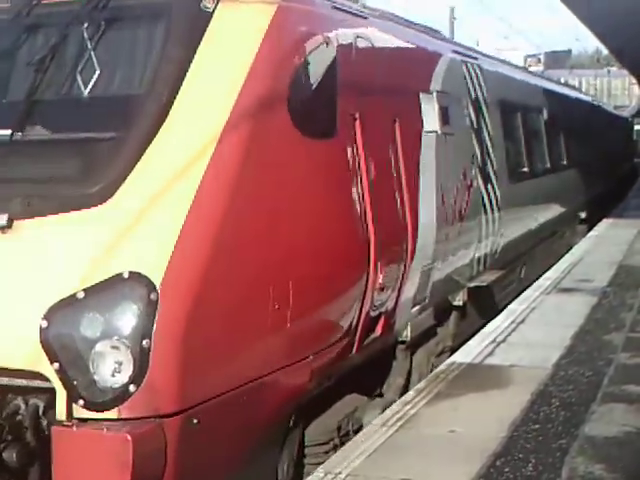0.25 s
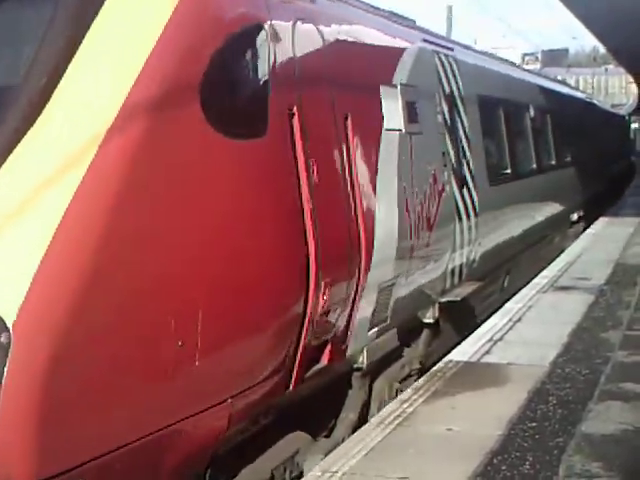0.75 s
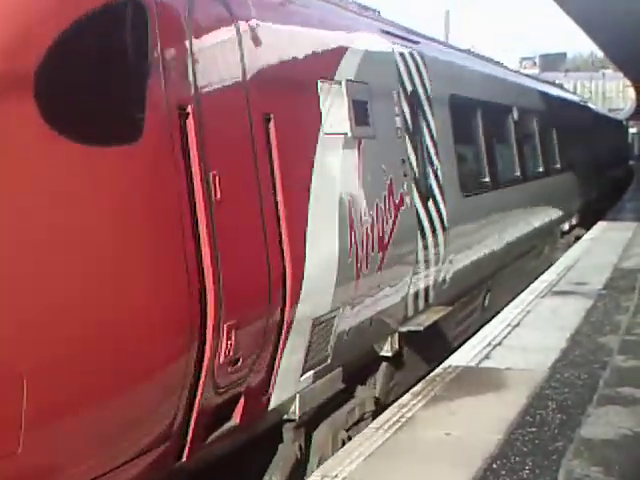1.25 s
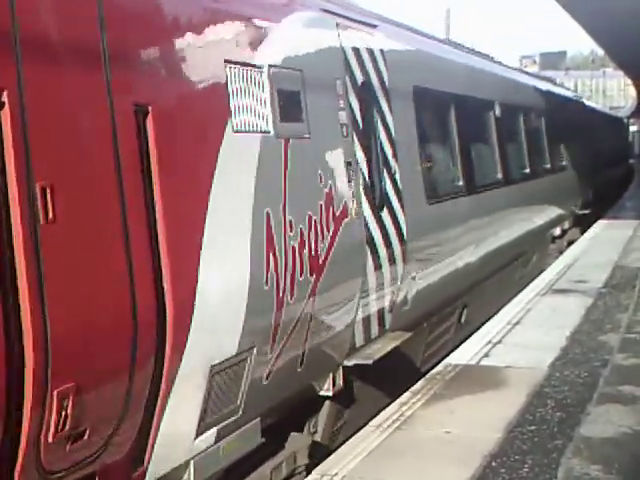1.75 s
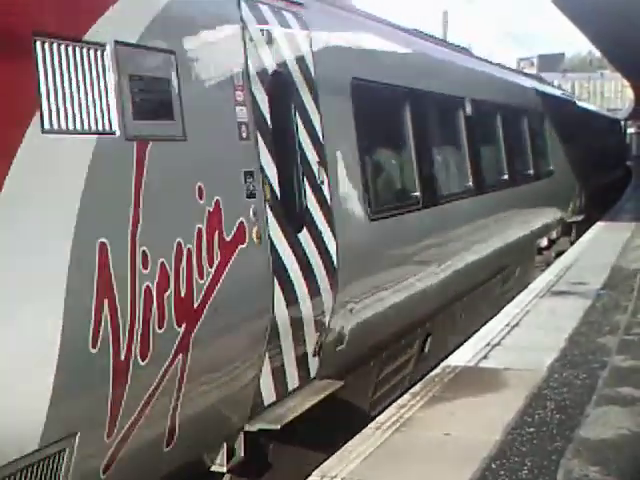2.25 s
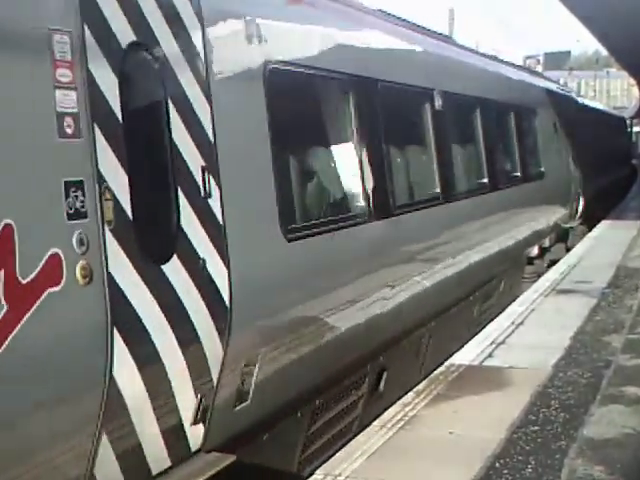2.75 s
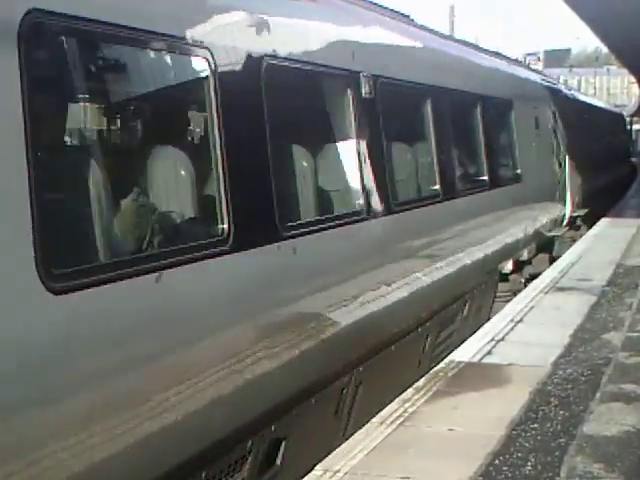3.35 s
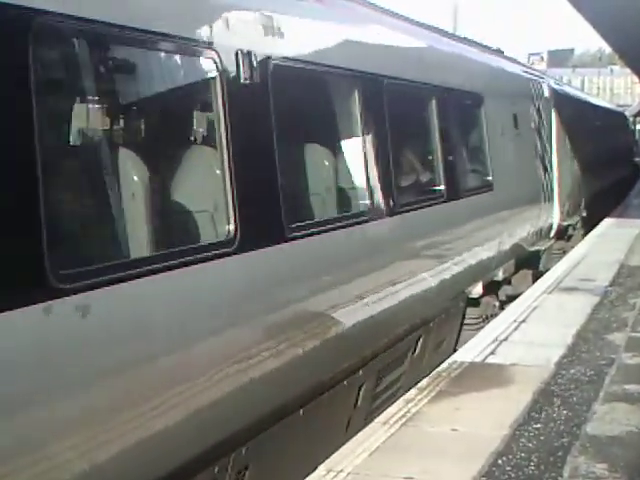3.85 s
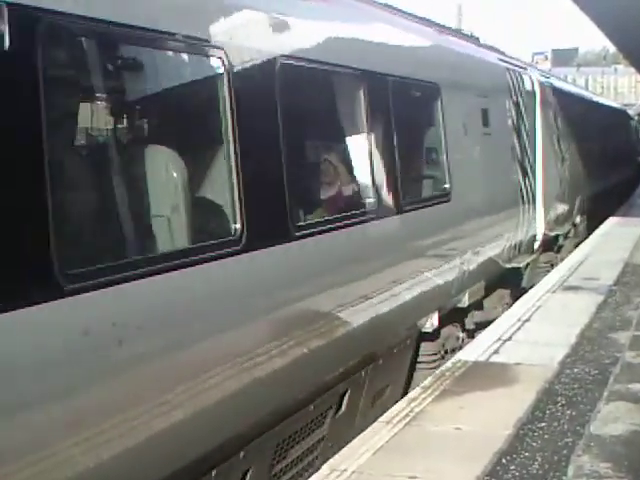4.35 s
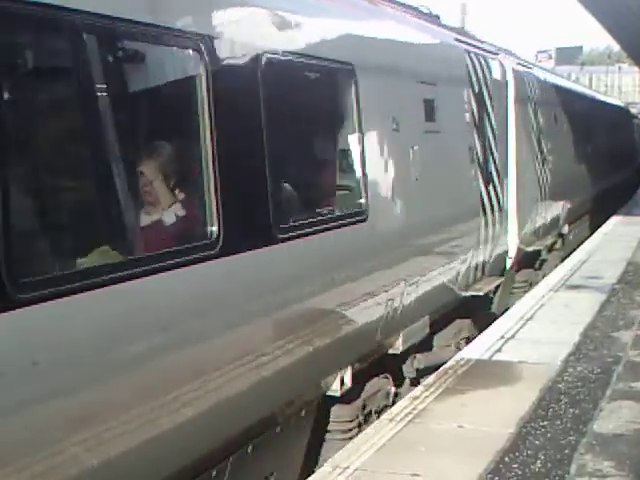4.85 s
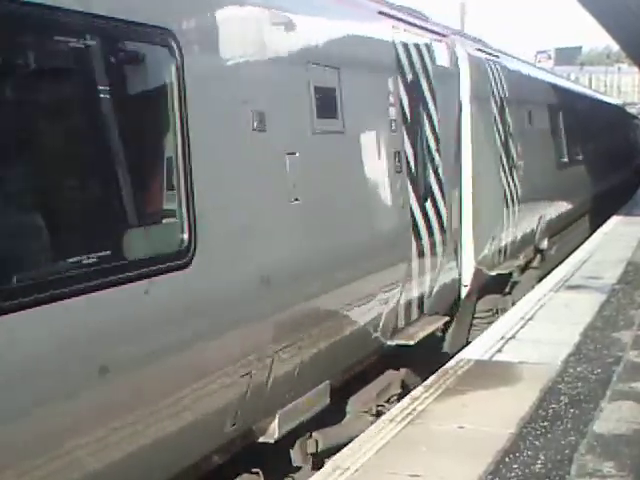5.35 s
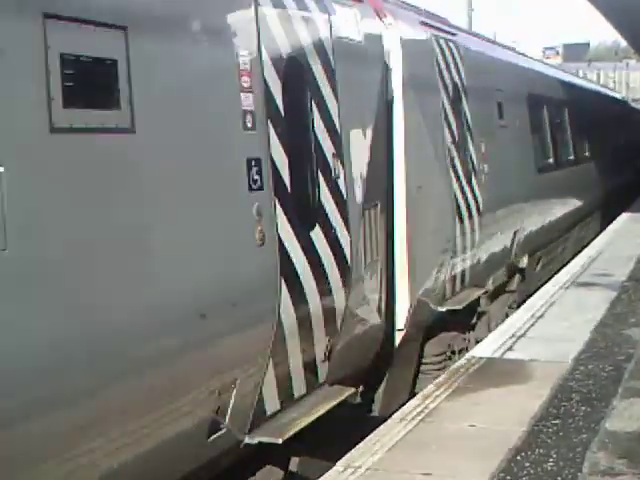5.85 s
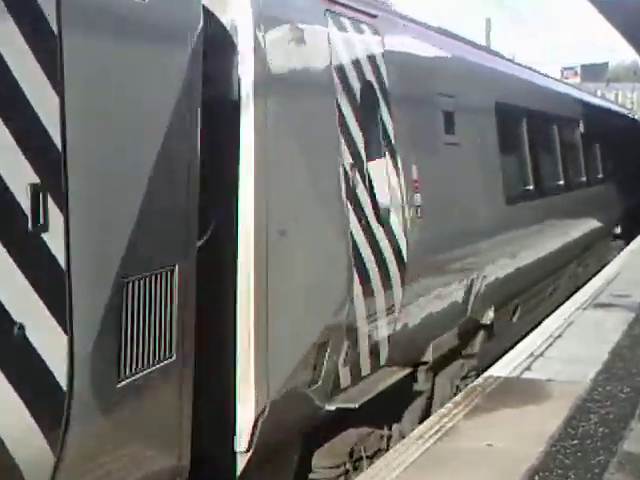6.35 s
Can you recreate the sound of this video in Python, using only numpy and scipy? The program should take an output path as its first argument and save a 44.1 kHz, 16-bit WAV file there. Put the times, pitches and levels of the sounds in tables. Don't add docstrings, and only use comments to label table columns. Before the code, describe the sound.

Low pulsing diesel drone gathers speed as a passenger train rolls past; rumble, wheel thuds, passing hums and a fuzzy turbo whine, dully captured.

```python
import sys
import numpy as np
from scipy import signal
from scipy.io import wavfile
from scipy.ndimage import uniform_filter1d

SR = 44100
rng = np.random.default_rng(int(sys.argv[2]) if len(sys.argv) > 2 else 0)


def store_wav(level_fs):
    pcm = np.round(np.clip(np.atleast_2d(level_fs), -1, 1) * 32767)
    wavfile.write(sys.argv[1], SR, pcm.T.astype(np.int16))


def ratio_of_db(decibels):
    return 10 ** (np.asarray(decibels, float) / 20)


N = 290619
T = np.arange(N) / SR


def evened(x):
    return x / np.sqrt(np.mean(x ** 2) + 1e-20)


def curve(rows):
    t_s, value = np.transpose(rows)
    return np.interp(T, t_s, value)


def drift(max_hz):
    t = T[::256]
    slow = sum(np.sin(2 * np.pi * (f * t + rng.random())) for f in np.geomspace(max_hz / 10, max_hz, 12))
    return np.interp(T, t, evened(slow))


def swells(rows):
    t = T[::64]
    bells = sum(ratio_of_db(db) * np.exp(-.5 * ((t - at_s) / max(width_s, .02)) ** 2) for at_s, db, width_s in rows)
    return np.interp(T, t, bells)


def roar(colour, patchy_db, size=1024, resonances=()):
    hz = np.fft.rfftfreq(size, 1 / SR)
    a, b, patches = rng.standard_normal((4 * N // size + 6, len(hz), 3)).T
    patches = uniform_filter1d(patches, size=8, axis=0)
    patches = evened(uniform_filter1d(patches, size=12, axis=1))
    f, db_per_hz = np.transpose(colour)
    colour_db = np.interp(np.log(hz + 1), np.log(f + 1), db_per_hz, left=-90, right=-110)
    for at_hz, width_hz, db in resonances:
        colour_db = colour_db + db / (1 + (2 * (hz - at_hz) / width_hz) ** 2)
    z = (a + 1j * b) * ratio_of_db(colour_db[:, None] + patchy_db * patches)
    return evened(signal.istft(z, nperseg=size, noverlap=3 * size // 4)[1][:N])


def whistle(hz, width_hz, steady=0.):
    t = T[::16]
    r = np.exp(-np.pi * width_hz * t[1])
    noise = rng.standard_normal((len(t), 2)) @ [1, 1j]
    slow = signal.lfilter([(1 - r) ** 1.5], np.convolve([1, -r], [1, -r]), noise)
    carrier = np.exp(2j * np.pi * np.cumsum(hz + 0 * T) / SR)
    return evened((np.interp(T, t, steady + slow) * carrier).real)


def circuit_tones():
    # f/Hz, level/dB [rms]
    circuit = [(4800, -96), (5600, -86), (7400, -86), (9600, -90)]
    return sum(np.sqrt(2) * ratio_of_db(db) * np.sin(2 * np.pi * hz * T) for hz, db in circuit)


def machines():
    # f/Hz, level/dB [rms],
    # strongest t/s, earshot/s, waver/Hz
    auxiliaries = [(47.8, -43, 1, 1.9, 4.1), (50, -37, 5.3, 0.2, 5.8), (283, -47, .45, .15, 7.1),
                   (320, -42.5, 1.38, .15, 8), (382, -44.5, 4.05, 0.24, 10), (420, -46.5, 4.27, .15, 11),
                   (820, -50.5, 5.3, 0.18, 13), (371, -48, 4.9, 0.35, 11), (445, -43.5, 4.9, 0.17, 8.9),
                   (479, -42, 5.27, 0.18, 10), (517, -49, 4.95, 0.32, 14), (495, -49, 5.7, .25, 30),
                   (500, -47, 6.4, .3, 120), (398, -47, 3.59, .15, 21), (565, -40, 4.86, 0.32, 16),
                   (1072, -47, 5.05, .25, 20), (1051, -52.5, 4.34, 0.14, 20), (1213, -49.5, 5.15, 0.18, 13),
            (1220, -48.5, 6.03, 0.12, 19), (1104, -46.5, 5.75, 0.32, 150), (1225, -53, 6.35, .1, 10),
            (1603, -57, 4.9, 0.55, 12), (2727, -61, 4.2, 0.71, 66), (680, -46, 5.32, 0.13, 22),
            (1700, -54, 4.37, 0.34, 27), (5470, -75, 2.5, .9, 120), (6800, -76.5, 3.7, .5, 90),
            (6900, -65, 5.1, 0.39, 280)]
    return sum(swells([(t_s, db, heard_s)]) * whistle(hz, waver_hz, steady=.35)
               for hz, db, t_s, heard_s, waver_hz in auxiliaries)


def turbo():
    # t/s, level/dB [rms], in line/s
    inlets = [
        (2.4, -78, .4),
        (3.55, -68, .3),
        (4.75, -64.5, .3),
        (5.2, -58.5, .13),
        (5.7, -63.5, .15),
        (6.4, -69, .4),
    ]
    idle_hz, climb_hz_per_s, spool_s, spool_soft_s = 5300, 470, 3.4, .71
    since_s = T - spool_s
    hz = idle_hz + climb_hz_per_s * (since_s + np.hypot(since_s, spool_soft_s)) / 2
    tone = whistle(hz, 105)
    skirt = (.5 + .1 * T) * whistle(hz, 480)
    return swells(inlets) * (tone + skirt)


def casings(crank, bay_db):
    # f/Hz, level/dB [per Hz]
    rumble_colour = [(12, -30), (22, -14), (34, -7.5), (50, -2), (60, -3.5), (70, -12), (90, -39.5)]
    # f/Hz, level/dB [per Hz]
    drone_colour = [(160, -25), (280, -1), (323, -8), (525, -16.5), (882, -9), (1050, -15), (1230, -20.5),
                    (1680, -16), (2300, -28.5), (2780, -24), (3870, -42.5), (5380, -39.5), (5910, -49),
                    (8630, -41), (12000, -65.5), (15600, -99), (22000, -120)]
    # f/Hz, level/dB [per Hz]
    bay_colour = [(350, -34.5), (600, -5), (907, -5), (1080, -3.5), (1370, -13), (1660, -17), (2000, -15),
                  (2770, -14), (3060, -21), (3470, -19), (4630, -27.5), (6250, -25.5), (7550, -29),
                  (9580, -28), (12000, -52.5), (15600, -83), (22000, -120)]
    # f/Hz, level/dB [per Hz]
    boom_colour = [(250, -26.5), (330, 0), (430, 5), (580, -1.5), (680, -6.5), (900, -41)]
    # f/Hz, width/Hz, lift/dB
    resonances = [(1065, 88, 4.5), (1197, 140, -3), (1597, 120, 5.5), (1734, 86, 9), (1810, 150, -4),
                  (2754, 51, 3), (3420, 370, 2.5), (3880, 360, -3), (4200, 210, 4), (4630, 300, -2),
                  (5410, 180, 4), (6680, 150, 5), (8400, 900, 0.5)]
    # t/s, level/dB [rms], length/s
    thuds = [
        (1.4, -38, .2),
        (3.3, -42, .06),
        (4.55, -37, .12),
        (5.03, -33, .04),
        (5.6, -34, .08),
        (6.12, -34, .08),
    ]
    far_db, rumble_db, drone_db, boom_db = -77, -36.5, -46, -56
    drone_share, boom_share = .04, 1.35
    load_db_per_s, rumble_lumps_db = .4, 1.5
    open_s, shut_s, open_db, slide_s = 4.1, 6.0, 3.2, .05

    rise_db = bay_db - far_db
    gap = (np.tanh((T - open_s) / slide_s) - np.tanh((T - shut_s) / slide_s)) / 2
    drone_db = drone_db + drone_share * rise_db + load_db_per_s * T + open_db * gap
    boom_db = uniform_filter1d(boom_db + boom_share * rise_db, size=SR // 3)
    knock = 1 + .07 * np.cos(3 * crank) + .07 * np.cos(1.5 * crank) + .07 * np.cos(crank / 2)

    ground = ratio_of_db(rumble_db + rumble_lumps_db * drift(5)) + swells(thuds)
    rumble = ground * ratio_of_db(-3.0) * roar(rumble_colour, patchy_db=1.0, size=4096)
    drone = ratio_of_db(drone_db + 1.94) * roar(drone_colour, patchy_db=0.55, resonances=resonances)
    bay = ratio_of_db(bay_db + 17.0) * roar(bay_colour, patchy_db=0.54, resonances=resonances) * knock
    boom = ratio_of_db(boom_db - 4.8) * roar(boom_colour, patchy_db=0.1, size=2048) * knock ** 2
    return rumble + drone + bay + boom


def exhaust(crank, bay_db):
    # order, t/s, level/dB [rms], in line/s
    order_swells = [(3, 0.0, -37.0, 0.05), (3, 0.74, -36.0, 0.07), (3, 1.06, -26.0, 0.68), (3, 1.55, -31.0, 0.19),
                    (3, 2.16, -30.5, 0.12), (3, 3.04, -34.5, 0.1), (3, 3.78, -32.5, 0.35), (3, 4.13, -36.0, 0.06),
                    (3, 4.82, -36.5, 0.2), (3, 4.89, -31.5, 0.05), (3, 5.3, -25.0, 0.14), (3, 5.68, -27.5, 0.17),
                    (3, 6.18, -36.5, 0.06), (3, 6.55, -31.0, 0.1), (6, 0.43, -29.0, 0.15), (6, 0.87, -26.5, 0.16),
                    (6, 1.38, -29.5, 0.09), (6, 1.78, -28.5, 0.15), (6, 2.57, -31.0, 0.1), (6, 2.74, -25.0, 0.32),
                    (6, 3.3, -29.0, 0.08), (6, 3.53, -29.5, 0.1), (6, 3.87, -32.0, 0.1), (6, 4.44, -37.5, 0.04),
                    (6, 4.56, -33.0, 0.34), (6, 5.27, -29.0, 0.13), (6, 5.69, -27.0, 0.12), (6, 6.01, -30.5, 0.1),
                    (6, 6.49, -34.0, 0.14),
                    (4, 4.71, -44.0, 0.7), (4, 5.39, -47.0, 0.1), (4, 6.5, -37.0, 0.44), (5, 3.81, -44.5, 0.08),
              (5, 4.11, -41.0, 0.07), (5, 4.36, -41.0, 0.06), (5, 4.38, -37.5, 0.7), (5, 5.24, -36.5, 0.12),
              (5, 5.8, -43.0, 0.04), (5, 6.2, -31.5, 0.28), (7, 0.0, -46.0, 0.09), (7, 2.45, -40.5, 0.09),
              (7, 4.25, -46.5, 0.19), (7, 5.15, -38.5, 0.05), (7, 5.6, -34.5, 0.43), (7, 5.95, -37.0, 0.05),
              (7, 6.38, -39.5, 0.11), (8, 0.0, -43.5, 0.08), (8, 0.98, -43.5, 0.08), (8, 1.69, -33.0, 0.64),
              (8, 2.32, -33.0, 0.1), (8, 3.14, -43.5, 0.06), (8, 3.74, -45.0, 0.19), (8, 5.41, -38.5, 0.46),
              (8, 5.93, -39.0, 0.11), (8, 6.5, -38.5, 0.09),
                    (9, 0.16, -35.0, 0.05), (9, 0.28, -30.5, 0.23), (9, 1.05, -38.5, 0.07), (9, 1.1, -36.5, 0.44),
             (9, 2.45, -38.0, 0.13), (9, 3.12, -42.5, 0.14), (9, 4.2, -35.0, 0.09), (9, 4.48, -32.5, 0.12),
             (9, 5.05, -29.5, 0.19), (9, 5.54, -30.5, 0.2), (9, 6.11, -34.0, 0.07), (9, 6.31, -35.0, 0.16),
             (10, 0.27, -41.5, 0.1), (10, 0.37, -42.0, 0.55), (10, 2.02, -50.0, 0.43),
             (10, 5.33, -44.0, 0.09), (10, 5.62, -47.5, 0.7), (11, 0.51, -44.5, 0.06),
             (11, 1.25, -53.5, 0.7), (11, 4.85, -46.0, 0.69), (11, 6.17, -46.0, 0.26)]
    # order, level/dB [rms]
    floor_orders = [(3, -49), (4, -58), (5, -56), (6, -41), (7, -55), (8, -52), (9, -55), (10, -57),
                    (11, -60)]
    # order, far level/dB, near level/dB
    minor = [(1, -47, -48.5), (1.5, -48.5, -50), (2, -50, -48), (2.5, -64, -46), (3.5, -53, -62.5),
             (4.5, -53.5, -44), (5.5, -62, -47), (6.5, -57, -46), (7.5, -51.5, -53), (8.5, -51, -63.5),
             (9.5, -52.5, -55.5), (10.5, -53, -52), (12, -53.5, -57), (13, -53, -57), (14, -62.5, -56),
             (15, -59, -51.5)]
    # f/Hz, level/dB [per Hz]
    flow_colour = [(50, -28.5), (70, -6), (100, -7.5), (135, -4), (190, -1), (240, 0), (320, -9.5),
                   (450, -16.5), (600, -54)]

    near = uniform_filter1d(np.clip((bay_db - bay_db[0]) / 13.0, 0, 1), size=SR // 2)
    late = np.clip(T / 5 - .4, 0, 1)
    lined_up = order_swells
    out = np.zeros(N)
    for order, floor_db in floor_orders:
        size = ratio_of_db(floor_db) + swells([row[1:] for row in lined_up if row[0] == order])
        lag = .23 * order - .8 + .2 * late * (order - 6.5) ** 2 + .3 * drift(.8)
        out += size * ratio_of_db(1.3 / order + .4 * drift(10)) * np.cos(order * crank - lag)
    for order, far_db, near_db in minor:
        lag = 2 * np.pi * rng.random() + .5 * drift(1)
        level_db = far_db + near * (near_db - far_db) + 1.9 * drift(2.5)
        out += ratio_of_db(level_db) * np.cos(order * crank - lag)
    flow = ratio_of_db(-41.5 + 5.5 * near ** 2) * roar(flow_colour, patchy_db=2.8, size=4096)
    return np.sqrt(2) * out + flow


def scene():
    # t/s, crank rate/(turns/s)
    speed = [(0.0, 22.99), (0.4, 23.58), (0.8, 24.15), (1.2, 24.34), (1.6, 24.99), (2.0, 25.19),
             (2.4, 25.91), (2.8, 26.4), (3.2, 26.92), (3.6, 27.33), (4.0, 27.75), (4.4, 28.25),
             (4.8, 28.53), (5.2, 28.81), (5.6, 29.07), (6.0, 29.15), (6.4, 29.42), (6.59, 29.5)]
    # t/s, level/dB
    nearness = [(0.0, -77), (1.3, -77), (1.9, -73), (2.55, -70), (3.0, -70.5), (3.6, -66.5), (4.05, -65),
                (4.15, -62), (4.8, -59), (5.31, -58), (5.39, -63), (5.85, -63.5), (6.15, -71), (6.5, -71.5),
                (6.59, -68)]
    crank = 2 * np.pi * np.cumsum(curve(speed)) / SR
    bay_db = curve(nearness)
    return (machines() + turbo() + casings(crank, bay_db) + exhaust(crank, bay_db))[None]


def top_cut(x):
    return signal.sosfilt(signal.butter(12, 12150, fs=SR, output="sos"), x)


def record(dry):
    heard = signal.sosfilt(signal.butter(1, 22, "high", fs=SR, output="sos"), dry)
    start = np.sin(np.pi / 2 * np.minimum(T / .003, 1)) ** 2
    mix = (heard + circuit_tones() + .0005) * start
    return top_cut(mix)


dry = scene()
out = record(dry)
store_wav(out)
```